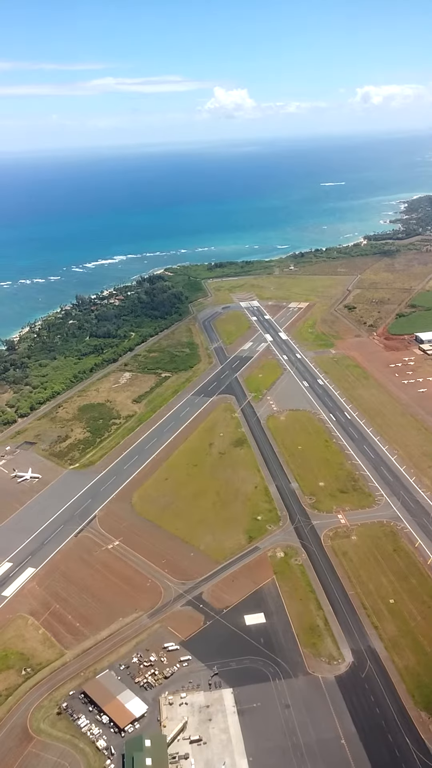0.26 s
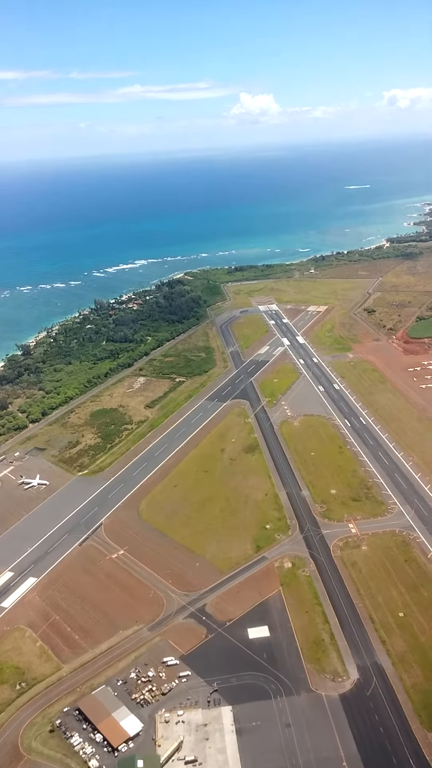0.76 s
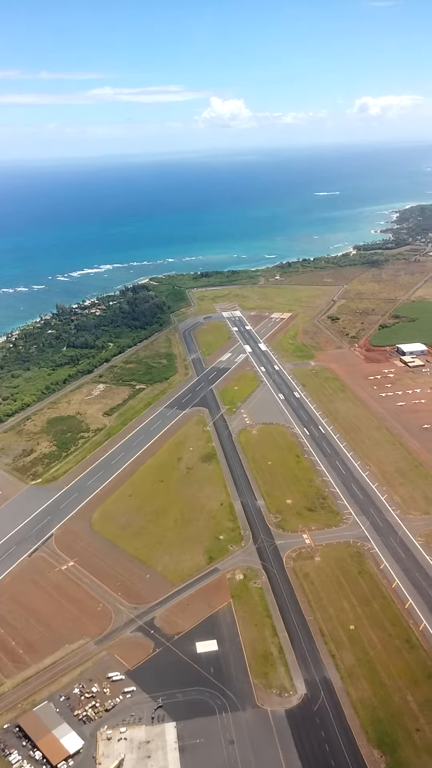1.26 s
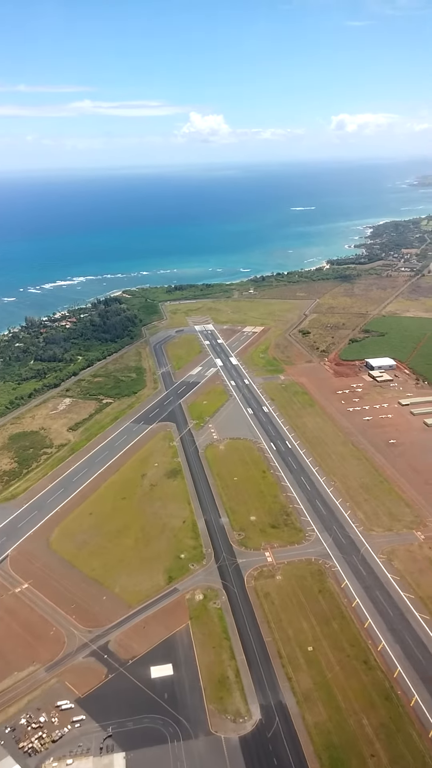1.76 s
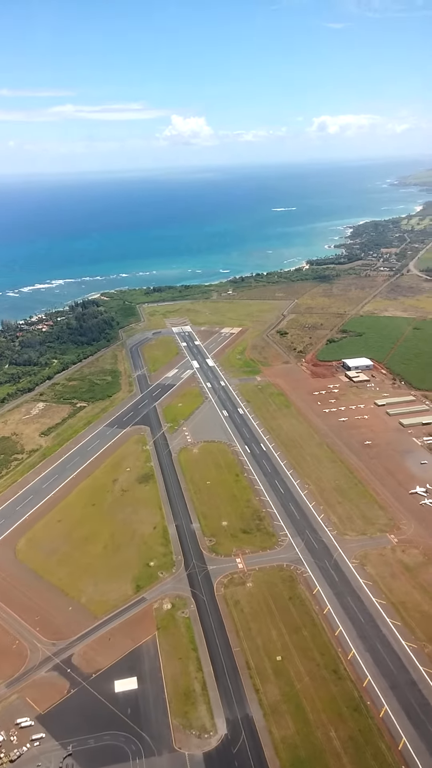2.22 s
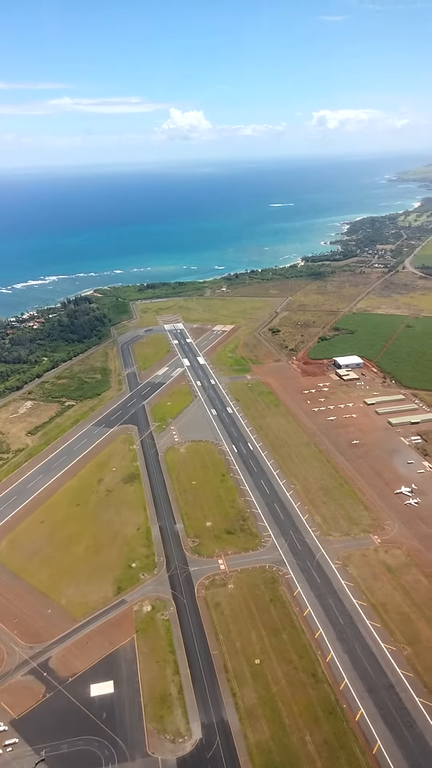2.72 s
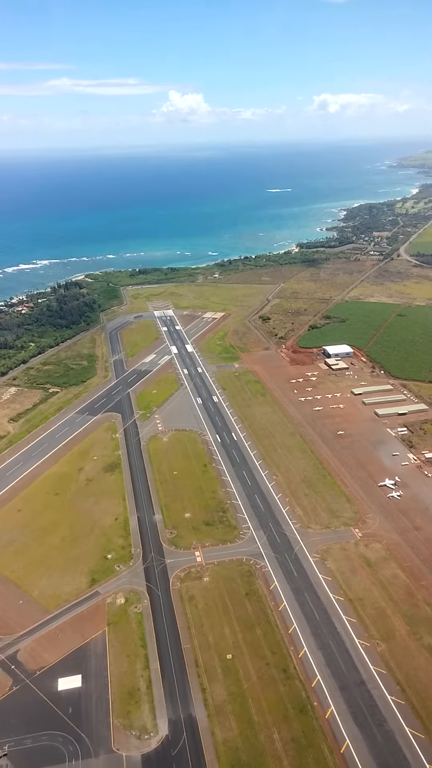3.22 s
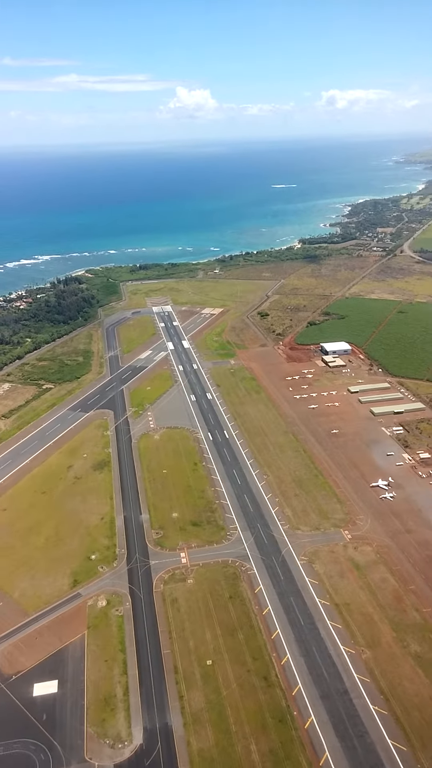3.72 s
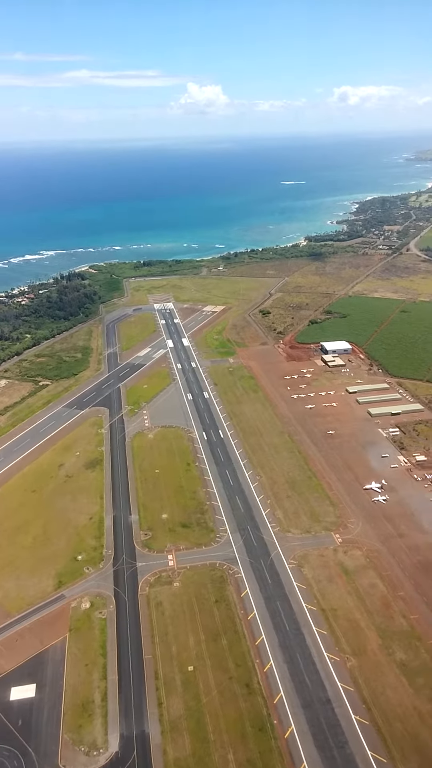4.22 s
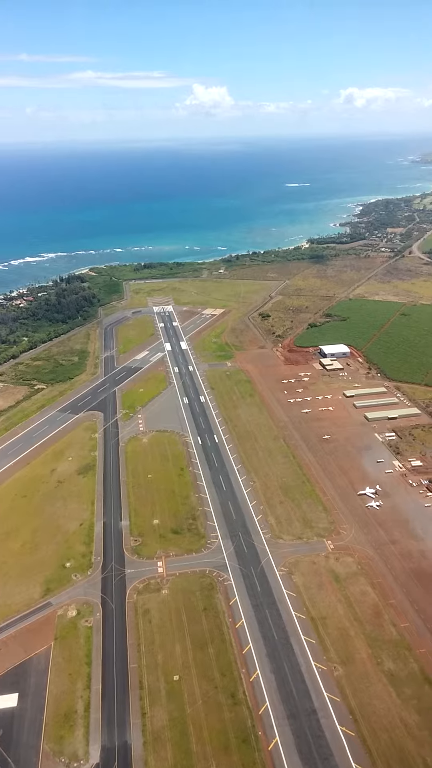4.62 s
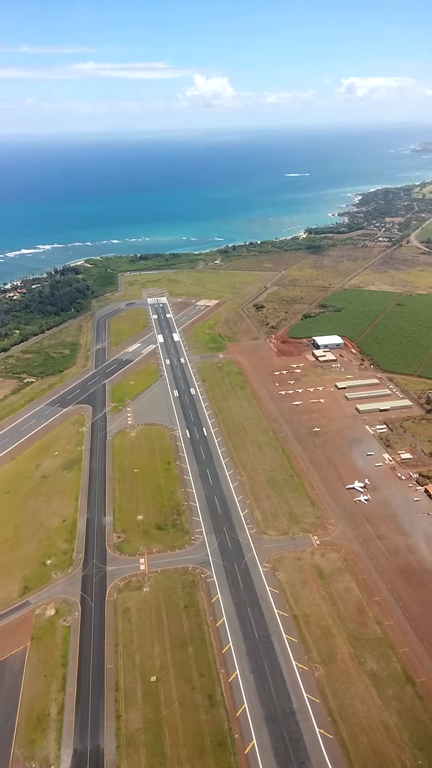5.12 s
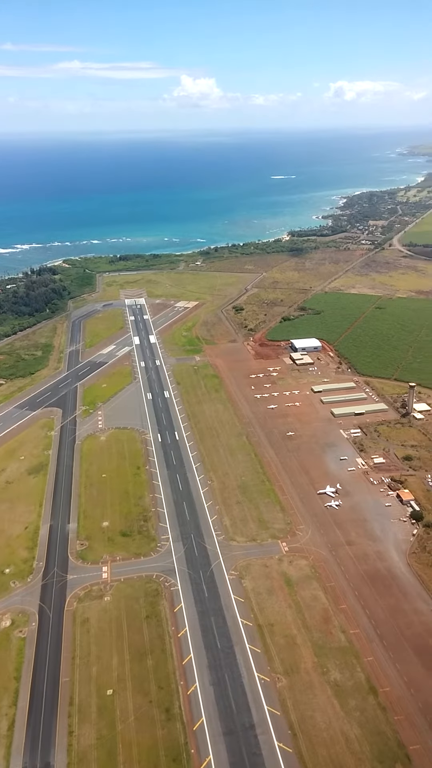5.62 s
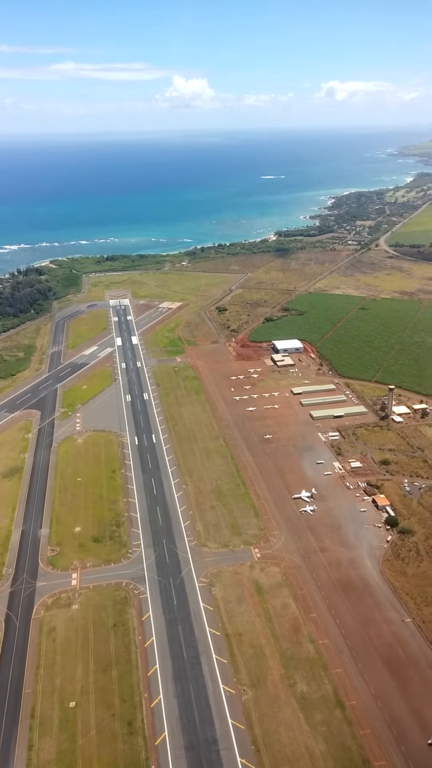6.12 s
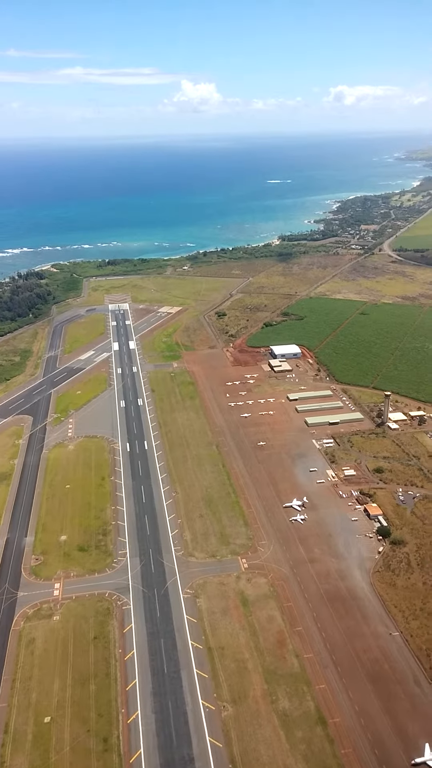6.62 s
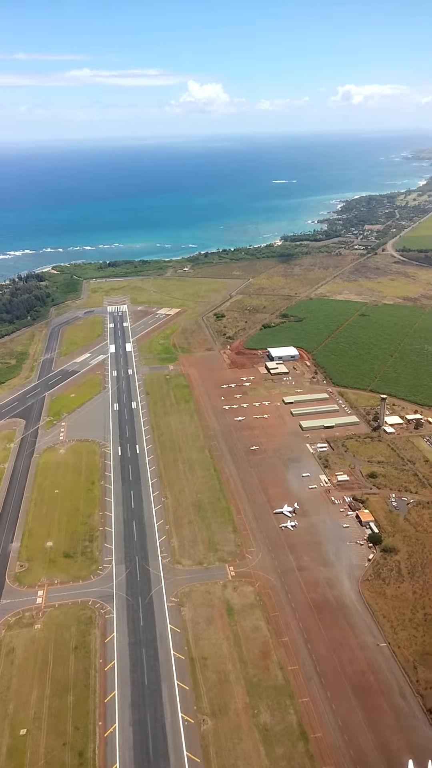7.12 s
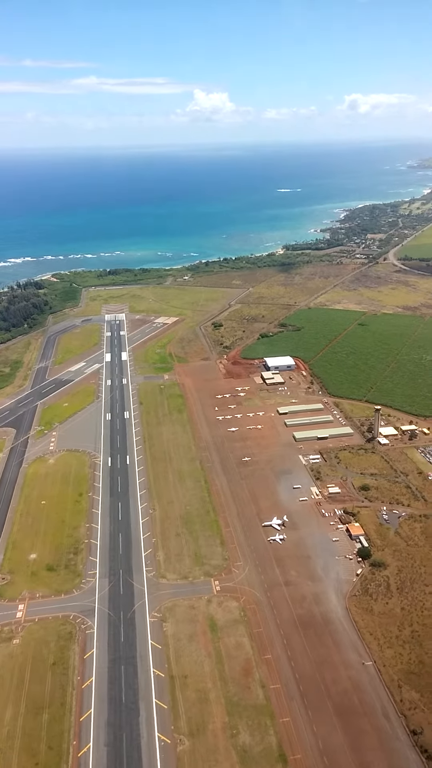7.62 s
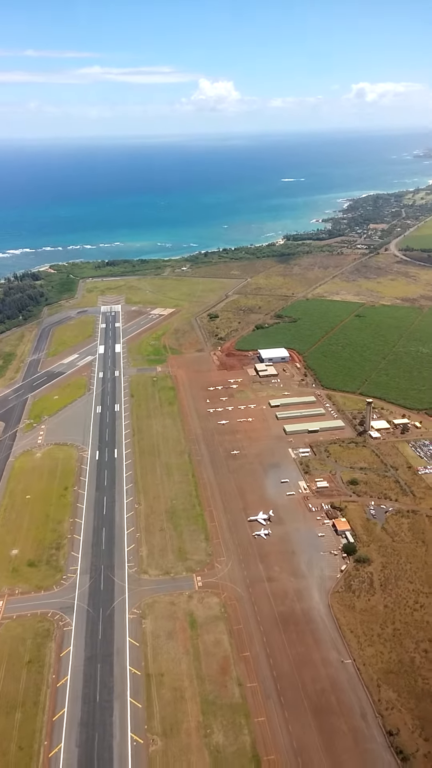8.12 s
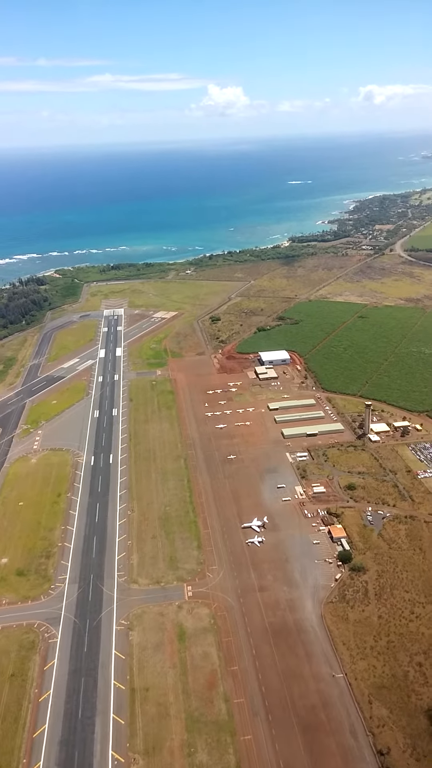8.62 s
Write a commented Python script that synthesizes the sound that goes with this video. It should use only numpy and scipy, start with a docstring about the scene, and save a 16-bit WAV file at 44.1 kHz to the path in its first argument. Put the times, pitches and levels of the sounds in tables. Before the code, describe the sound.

Loud, steady helicopter rotor chop fills the cabin, with rumbling wind, a fluttering hiss and a thin gear whine above it.

```python
"""A heavy rotor thump, 19 beats a second, over the rumble and roar of air: a helicopter cabin in flight.
The drive shaft hums, the gear teeth sing a thin whine, the turbine whistles above it, and air hisses
and whistles through a door seal on the right. Late on, a turn loads the blades and they slap harder.
Each blade's pressure pulse chokes the microphone for a moment, and a fast limiter rides the loud bass."""
import sys
import numpy as np
from scipy import signal
from scipy.fft import rfft, irfft, next_fast_len
from scipy.io import wavfile
from scipy.ndimage import uniform_filter1d, minimum_filter1d, map_coordinates

SR = 44100
rng = np.random.default_rng(int(sys.argv[2]) if len(sys.argv) > 2 else 0)


def waveform_to_disk(signal):
    """Save audio, clipped to [-1, 1], as 16-bit WAV at the path in sys.argv[1]."""
    frames = np.transpose(np.atleast_2d(signal))
    scaled = np.clip(frames, -1, 1) * 32767
    samples = np.round(scaled).astype(np.int16)
    wavfile.write(sys.argv[1], SR, samples)


N = 390726
MESH_PER_BLADE = 88.08  # tooth contacts of the main gear per blade pass


def rotor(blades, loading):
    """Harmonics of the blade rate: a low thump, and a drone above it whose phases the cabin scatters."""
    # rotor harmonics: multiple, light_load_db, heavy_load_db
    harmonics = [(2, -17, -16), (3, -17, -18), (4, -16.8, -19.5), (5, -26, -18.5), (6, -28, -20.5),
                 (7, -30, -26), (8, -27.5, -20.5), (10, -27, -31), (11, -33, -31), (12, -35, -19.5),
                 (13, -34, -24), (16, -34, -28), (17, -38, -26), (18, -33, -30), (19, -30, -30),
                 (20, -33, -27), (24, -40, -35)]
    # fader ride on the thump: time_s, gain_db
    thump_ride = [(0, 0), (1.35, -2.5), (1.5, -8), (1.68, 0.5), (2.7, -2), (2.9, 4), (3.1, 0), (4.2, 0),
                  (4.58, -3.5), (4.75, 1), (5.85, 1.5), (6.1, -2), (7, -4), (7.55, -2.5), (7.7, -4),
                  (7.82, -0.5), (8.86, 1.5)]
    thump, drone = np.zeros((2, N))
    for k, light_db, heavy_db in harmonics:
        scatter = rng.uniform(0, 2 * np.pi) * (k > 5)
        level_db = light_db + (heavy_db - light_db) * loading + 2.2 * wobble(6)
        phase = 2 * np.pi * k * blades + scatter + 0.02 * k * wobble(5)
        tone = amp(level_db) * np.sqrt(2) * np.cos(phase)
        if k > 8:
            drone += tone
        else:
            thump += tone
    return amp(curves(thump_ride)[0] + 1.2 * wobble(14)) * thump, drone


def blade_accents(blades):
    """Change of the slap in dB, held through the pass of each blade that strikes harder or softer."""
    # accented blades: time_s, slap_change_db
    accents = [(2.469, 0), (2.882, 0), (2.931, 5), (3.462, 6), (3.819, 16), (4.382, 10), (5.153, 3),
               (5.306, -2), (5.464, 1), (6.087, 2), (6.701, -8), (6.859, 1), (7.061, 2), (8.457, -2),
               (8.557, 4)]
    nearest = np.round(blades)
    return sum(db * (nearest == nearest[int(s * SR)]) for s, db in accents)


def microphone_choke(blades, height, ahead, behind, bass, sideslip):
    """Gain of the microphone: it stalls while the blade's pulse plus the bass press it past full scale."""
    nearest = np.round(blades).astype(int)
    unevenness = .09 + .1 * sideslip
    strength = np.exp(unevenness * rng.standard_normal(nearest.max() + 2)[nearest])
    phase = blades - nearest
    pressure = height * pulse(phase, delay=0, width=np.where(phase < 0, .106, .098))
    pressure += ahead * pulse(phase, delay=-.225, width=.075)
    pressure += behind * pulse(phase, delay=.265, width=.075)
    overload = strength * pressure + .8 * bass - 1
    stalled = (1 + np.tanh(overload / .13)) / 2
    return amp(-23 * stalled)


def hull_rumble():
    """Airflow rumbles on the hull, easing when the door seal opens and growing in the turn."""
    # rumble colour: frequency_hz, relative_db
    spectrum = [(10, -43), (30, -3), (48, -9), (70, 2), (105, 0), (155, 0.5), (205, 0), (255, -2),
                (320, -8.5), (400, -18.5), (600, -73), (1200, -90)]
    # fader ride: time_s, level_db
    ride = [(0, -9), (.38, -8.5), (.6, -11.5), (3, -9), (5, -10.5), (6.3, -8.5), (8.86, -9)]
    return amp(curves(ride)[0] + 2 * wobble(18)) * turbulence(spectrum, patchy_db=2)


def airflow_roar(blades, loading, sideslip, lift_db):
    """The roar jumps behind each blade, then sags; a loaded blade slaps the wake of the one before."""
    # roar colour: frequency_hz, relative_db
    spectrum = [(100, -56), (260, 0.5), (380, 2), (520, 0), (680, -0.5), (820, -3), (950, -4.5),
                (1090, -10), (1190, -15.5), (1310, -11), (1520, -37.5), (2200, -26.5), (5000, -64)]
    slap_db = (6 * loading + blade_accents(blades)) * pulse(blades % 1, delay=.1, width=.05)
    sag_db = 3.2 * (blades % 1 - .5)
    level_db = -16 - 2.5 * sideslip + lift_db + slap_db - sag_db
    return amp(level_db) * turbulence(spectrum, patchy_db=2.1)


def drive_shaft(blades):
    """The engine's shaft hums, one cycle per turn of the pinion that it drives."""
    pinion_teeth = 17
    turns = blades * MESH_PER_BLADE / pinion_teeth
    return amp(-23.5) * np.sqrt(2) * np.sin(2 * np.pi * turns)


def gearbox(blades, sideslip, gust_db):
    """The main mesh and the accessory gears turn with the rotor; their whine flickers more in the turn."""
    # fader ride on the whine: time_s, level_db
    ride = [(0, -28), (.9, -31), (2.2, -29.5), (2.6, -27.5), (3.5, -32), (4.1, -29), (6.1, -30.5), (7, -34),
            (8, -38.5), (8.86, -37)]
    # accessory gears: shaft_multiple, level_db, left_minus_right_db
    accessories = [(2, -43, -19), (4, -51.5, 8), (5, -54.5, 18), (6, -58, 4), (7, -74, 0)]
    shaft_per_mesh = .3783
    waver_db = 1.24 + .6 * sideslip
    port_phase = np.array([[0], [np.pi / 2]])  # standing waves put the ports a quarter cycle apart

    def tone(ratio, db):
        level = amp(db + waver_db * wobble(14))
        phase = 2 * np.pi * ratio * MESH_PER_BLADE * blades + port_phase + 0.15 * wobble(36)
        return level * np.sqrt(2) * np.sin(phase)

    mesh_db = curves(ride)[0] + .9 * gust_db
    throb_db = -1.4 * np.cos(2 * np.pi * blades)  # swells between one blade and the next
    whine = pan(5.5) * tone(1, mesh_db + throb_db)
    swell_db = mesh_db - mesh_db.mean()
    for multiple, db, side_db in accessories:
        whine += pan(side_db) * tone(multiple * shaft_per_mesh, db + swell_db)
    return whine


def cabin_rush(blades, sideslip, level_db):
    """Air rushes along the cabin; in the turn each blade's torn wake swishes past."""
    # rush colour: frequency_hz, relative_db
    spectrum = [(600, -1.5), (1400, 1), (1750, 3), (2020, -1), (2260, 3.5), (2480, -3.5), (3000, -3.5),
                (3700, -8.5), (5100, -11.5), (7000, -8), (11000, -37), (16000, -32)]
    swish_db = 4 * sideslip * pulse(blades % 1, delay=.24, width=.15)
    return amp(level_db + swish_db) * turbulence(spectrum, patchy_db=1.3)


def seal_hiss(level_db):
    """Air leaks through the door seal in a bright, fluttering hiss."""
    # hiss colour: frequency_hz, relative_db
    spectrum = [(3000, -53), (5200, -20), (6000, -11), (6450, -1), (6900, -1.5), (8100, 4), (9000, 1),
                (10050, 1.5), (10800, -5), (11800, -9), (13500, -9), (16000, -11)]
    return amp(level_db + 1.9 * flutter(130, size=7000)) * turbulence(spectrum, patchy_db=1.4)


def whistles(sideslip, rush_db, hiss_db):
    """Breathy resonances: the low ones ride on the rush, the high on the hiss; the turn remixes them."""
    # cabin resonances first, then seal and turbine: pitch_hz
    pitches = [155, 470, 1180, 2190, 4620, 4795, 5900, 6450, 8010, 8140, 9605, 10020, 11458]
    # each whistle: width_hz, straight_over_air_db, turning_over_air_db, left_minus_right_db
    voices = [(14, 9, 15, 3.5), (90, -10, 12.5, 6), (110, -1, -1, 2.5), (150, -26, -0.5, 0),
              (350, -35, -5, 0), (130, -25, -6, -8), (260, -20, -2.5, 1), (130, -19, -14, 4),
              (60, -20, -16, -9), (110, -17, -1, -6), (150, -11.5, -4, -10), (220, -7, -34, -16),
              (70, -16, -24, -8)]
    out = np.zeros((2, N))
    for hz, (width_hz, straight_db, turning_db, side_db) in zip(pitches, voices):
        band = narrow_noise(hz, width_hz, channels=1 if hz < 500 else 2)  # long waves reach both ports
        air_db = rush_db if hz < 3000 else hiss_db
        level_db = air_db + straight_db + (turning_db - straight_db) * sideslip
        out += pan(side_db) * amp(level_db + 3.5 * flutter(35, size=5000)) * band
    return out


def fizz(gust_db):
    """A faint fizz that follows the gusts and goes on while the microphone is choked."""
    # fizz colour: frequency_hz, relative_db
    spectrum = [(800, -4), (2500, 2.5), (4500, -3), (9000, -4), (12000, -11.5), (16000, -25)]
    return amp(-42 + .97 * gust_db) * turbulence(spectrum, patchy_db=1.5)


def gusts(blades, sideslip):
    """Gusts and lulls move roar and hiss, in dB; in the turn both also swell once per revolution."""
    # gusts (+) and lulls (-): middle_s, length_s, roar_change_db, hiss_change_db
    events = [(0.89, 0.1, -3.5, 0), (1.095, 0.24, -3.5, 1.5), (1.354, .1, 1.5, 1.5), (1.463, 0.023, 4, 2),
              (1.574, 0.05, -4, -5.5), (2.206, .13, -2.5, -1.5), (2.37, 0.088, 2.5, 3),
              (2.494, 0.076, 8, 1), (2.74, .08, 4, 1.5), (2.904, 0.048, -1.5, -5.5),
              (3.157, 0.44, 2.5, 2.6), (3.818, 0.03, 6, 3), (3.984, 0.051, 0, 3), (4.16, 0.092, 0, 3),
              (4.326, 0.19, -4, -3), (4.387, .025, 4.5, -0.5), (4.546, 0.082, 4, 0.5),
              (4.914, 0.15, 2.5, 0.5), (5.17, .07, 1.5, -1.5), (5.374, 0.071, -4, -4.5),
              (5.62, 0.2, 0.5, 2.5), (5.9, 0.14, -2, -0.5), (6.255, 0.088, -1.5, -1),
              (6.45, 0.061, -3.5, -3), (6.724, 0.078, 4.5, 4.5), (6.793, 0.078, -2, -4), (6.9, .07, 3.5, 1),
              (7.02, 0.019, 3, 4.5), (7.28, 0.12, -3, -3), (7.43, 0.027, 1.5, 5.5), (7.532, .04, 1, 4),
              (7.636, 0.028, 2, 3), (7.753, 0.045, -9, -3.5), (8.412, 0.041, -5, -8), (8.587, 0.061, 5, 5)]
    blade_count = 3
    swells_db = sum(np.outer(changes_db, bump(s, length_s)) for s, length_s, *changes_db in events)
    return swells_db + 1.4 * sideslip * np.cos(2 * np.pi * (blades - 1.1) / blade_count)


def air_levels(gust_db):
    """Levels in dB of the rush and the seal hiss; both rise and fall with the gusts."""
    # fader ride on the rush: time_s, level_db
    rush_ride = [(0, -25.5), (.4, -26), (.85, -32), (1.8, -30.5), (3.1, -29.5), (3.7, -30.5), (4.9, -29.5),
                 (5.9, -33.5), (7.2, -32), (8.86, -36)]
    # fader ride on the hiss, as the seal opens half a second in: time_s, level_db
    hiss_ride = [(0, -36.5), (.42, -38), (.58, -29.5), (1.15, -29.5), (2.1, -28.5), (3.3, -32.5),
                 (3.7, -34.5), (5.6, -34), (6.3, -35.5), (7.4, -36), (8.86, -39.5)]
    return curves(rush_ride)[0] + .88 * gust_db, curves(hiss_ride)[0] + gust_db


def turbulence(spectrum, patchy_db):
    """Stereo air noise with drifting patches of gain; the mean of both microphone ports has rms 1."""
    # stereo width of the cabin air: frequency_hz, left_right_correlation
    likeness = [(60, .995), (170, .98), (350, .87), (700, .48), (1400, .08), (3000, .1), (8000, .03)]
    # its stereo balance: frequency_hz, left_minus_right_db
    balance = [(100, 1.5), (270, -1.5), (430, 1), (700, -4.5), (870, 2), (1150, 8.5), (1500, 2.5),
               (2200, 0.5), (2800, 3.5), (3800, -0.5), (4800, -7.5), (6300, 0.5), (7500, -1), (9000, -11.5),
               (11000, -12.5)]

    def mid_side(hz):
        spread = np.arccos(np.clip(along(likeness, hz), -1, 1)) / 2
        return amp(along(spectrum, hz)) * [np.cos(spread), np.sin(spread)]

    frames = signal.stft(rng.standard_normal((2, N)), nperseg=512)[2]
    patches = uniform_filter1d(rng.standard_normal(frames.shape[1:]), size=5, axis=0)  # across pitch
    patches = uniform_filter1d(patches, size=12, axis=1)  # across time
    noise = signal.istft(frames * amp(patchy_db * unit(patches)), nperseg=512)[1][:, :N]
    mid, side = filtered(noise, mid_side)
    ports = filtered(np.array([mid + side, mid - side]), lambda hz: pan(along(balance, hz)))
    return ports / np.std(ports.mean(axis=0))


def narrow_noise(hz, width_hz, channels):
    """A narrow band of noise, rms 1."""
    noise = rng.standard_normal((channels, N))
    return unit(filtered(noise, lambda f: 1 / (1 + ((f - hz) / width_hz * 2) ** 2)))


def pulse(phase, delay, width):
    """A bell-shaped pulse within a blade pass; delay and width are in blade periods."""
    return np.exp(-((phase - delay) / width) ** 2)


def bump(middle_s, length_s):
    """A smooth rise and fall, length_s wide at half height."""
    distance = 2 * (np.arange(N) / SR - middle_s) / length_s
    return 0.5 ** np.minimum(distance ** 2, 100)


def wobble(rate):
    """A smooth random curve, rate knots a second."""
    knots = rng.standard_normal(int(N * rate / SR) + 4)
    steps = np.arange(0, N, 20)
    return np.interp(np.arange(N), steps, map_coordinates(knots, [steps * rate / SR]))


def flutter(rate, size):
    """A wobble without slow swells: its running mean over size samples is taken out."""
    x = wobble(rate)
    return x - uniform_filter1d(x, size)


def curves(rows):
    """One value per sample for each column after the time."""
    s, *cols = np.transpose(rows)
    return [np.interp(np.arange(N) / SR, s, c) for c in cols]


def along(points, hz):
    """Joins (Hz, value) points on a log axis."""
    f, v = np.transpose(points)
    return np.interp(np.log(hz + 1), np.log(f + 1), v)


def filtered(x, response):
    """Equalises x with a gain that is a function of frequency."""
    m = next_fast_len(N + SR // 2)
    return irfft(rfft(x, m) * response(np.fft.rfftfreq(m, 1 / SR)), m)[..., :N]


def pan(db):
    """Constant-power gains for a left-minus-right level."""
    gains = np.vstack([amp(db / 2), amp(-db / 2)])
    return gains / np.sqrt(np.mean(gains ** 2, axis=0))


def amp(db):
    """Decibels to gain."""
    return 10 ** (np.asarray(db) / 20)


def unit(x):
    """Scaled to rms 1."""
    return x / np.sqrt(np.mean(x ** 2) + 1e-20)


def limiter(x, ceiling_db, hold_s):
    """Turns both channels down around every peak over the ceiling."""
    size = int(hold_s * SR)
    needed = np.minimum(1, amp(ceiling_db) / (np.abs(x).max(axis=0) + 1e-9))
    return x * uniform_filter1d(minimum_filter1d(needed, size), size)


def scene():
    """Thump, shaft hum and fizz run unbroken; everything else is chopped at the blade rate."""
    # rotor speed: time_s, blade_rate_hz
    speed = [(0, 19.38), (1.5, 19.33), (3, 19.34), (5, 19.38), (6, 19.4), (8.86, 19.41)]
    # blade load and pressure: time_s, loading (0-1), pulse_height, swell_ahead, swell_behind (full scales)
    flight = [(0, .4, 1.6, .68, .66), (1, 0, 1.55, .66, .68), (3, .1, 1.6, .66, .66),
              (4, .2, 1.75, .68, .8), (5, .45, 1.6, .72, .8), (6, 1, 1.36, .88, .55),
              (7.5, 1, 1.27, .88, .45), (8.86, .9, 1.2, .82, .45)]
    # sideways airflow in the turn: time_s, sideslip (0-1)
    turn = [(0, 0), (1.5, 0.12), (4, 0), (5.5, 0.16), (6.4, 0.55), (7.6, 0.68), (8.86, 0.84)]
    blade_hz, = curves(speed)
    loading, height, ahead, behind = curves(flight)
    sideslip, = curves(turn)
    first_blade_s = .0338
    blades = np.cumsum(blade_hz) / SR - first_blade_s * blade_hz[0]  # running count of blade passes
    roar_gust_db, gust_db = gusts(blades, sideslip)
    rush_db, hiss_db = air_levels(gust_db)
    wash = flutter(70, size=7000)  # rotor wash shakes roar, rush and hiss together

    rumble = hull_rumble()
    air = airflow_roar(blades, loading, sideslip, lift_db=roar_gust_db + 2.1 * wash)
    air += cabin_rush(blades, sideslip, rush_db + 1.3 * wash)
    air += seal_hiss(hiss_db + 1.1 * wash)
    thump, drone = rotor(blades, loading)
    height += .25 * (blade_accents(blades) > 0)  # hard blades push a higher pulse
    chop = microphone_choke(blades, height, ahead, behind, rumble.mean(axis=0), sideslip)
    whine = gearbox(blades, sideslip, gust_db) + whistles(sideslip, rush_db, hiss_db)
    return thump + drive_shaft(blades) + fizz(gust_db) + chop * (rumble + drone + air + whine)


def record(dry):
    """A duller left port, a low cut, a fast limiter and a steep top cut."""
    left_top_hz, low_cut_hz, top_hz = 11500, 55, 15800
    left = filtered(dry[0], lambda hz: 1 / np.sqrt(1 + (hz / left_top_hz) ** 50))
    ports = filtered(np.array([left, dry[1]]), lambda hz: hz ** 4 / np.hypot(hz ** 4, low_cut_hz ** 4))
    return filtered(limiter(ports, ceiling_db=-.1, hold_s=0.003), lambda hz: hz < top_hz)


dry = scene()
out = record(dry)
waveform_to_disk(out)
```